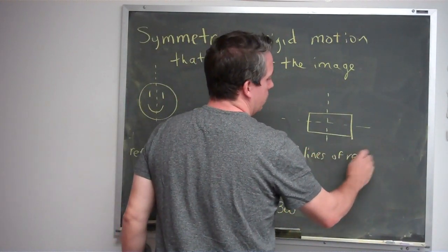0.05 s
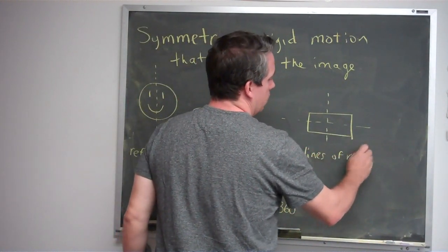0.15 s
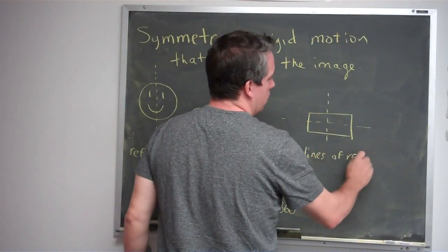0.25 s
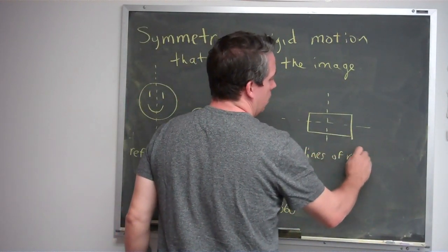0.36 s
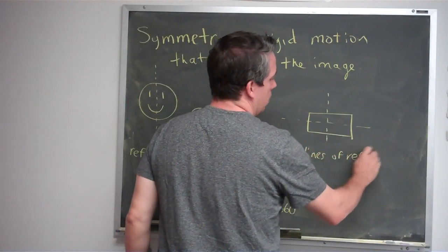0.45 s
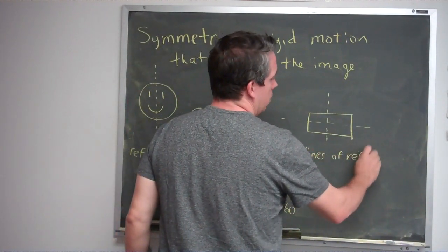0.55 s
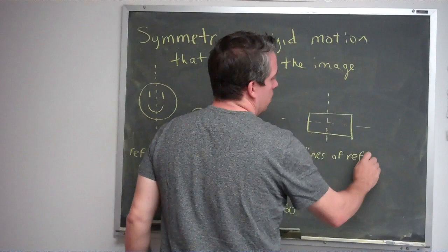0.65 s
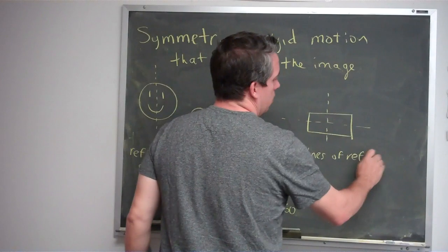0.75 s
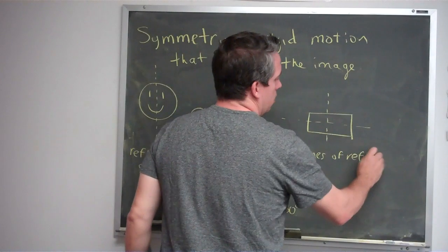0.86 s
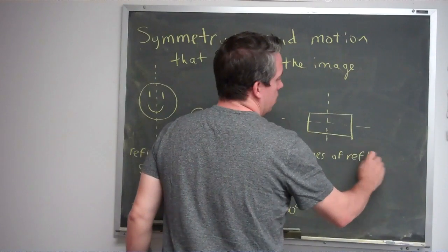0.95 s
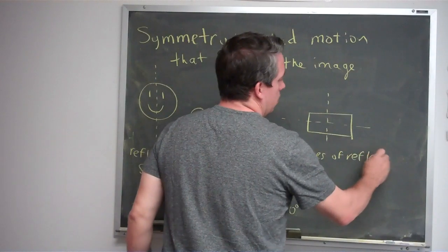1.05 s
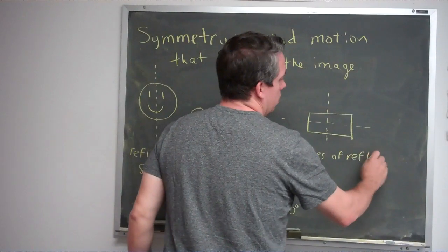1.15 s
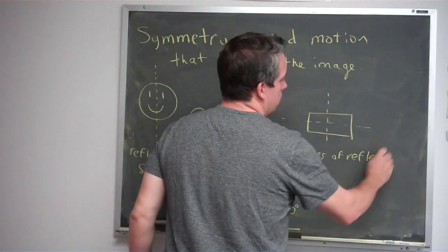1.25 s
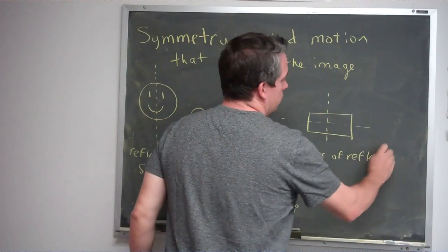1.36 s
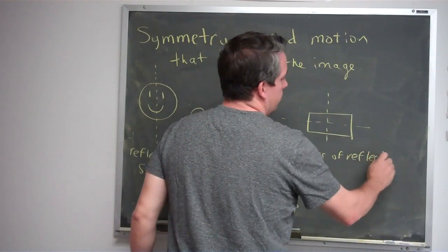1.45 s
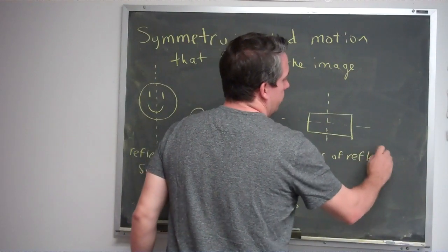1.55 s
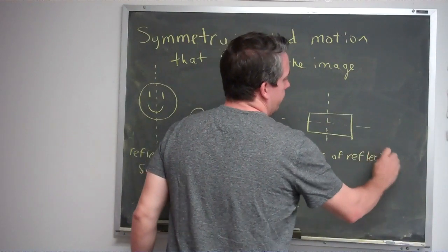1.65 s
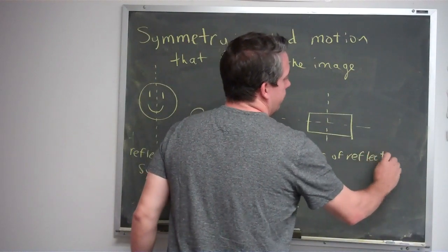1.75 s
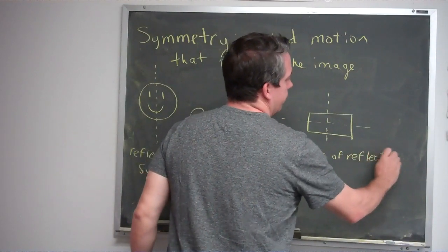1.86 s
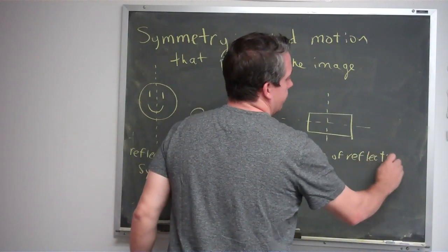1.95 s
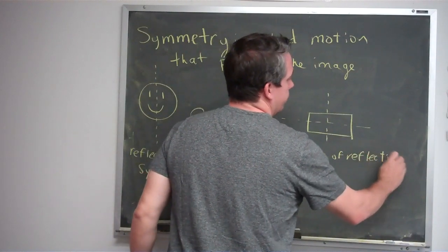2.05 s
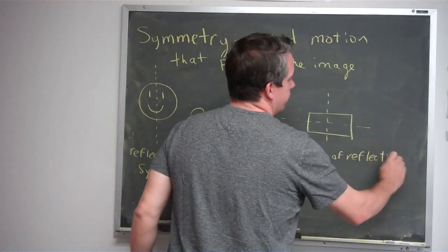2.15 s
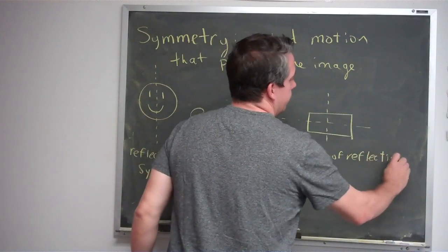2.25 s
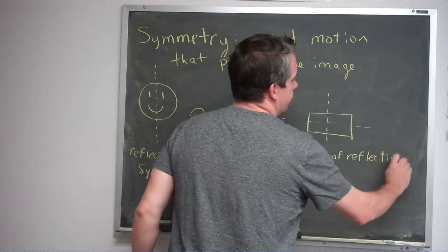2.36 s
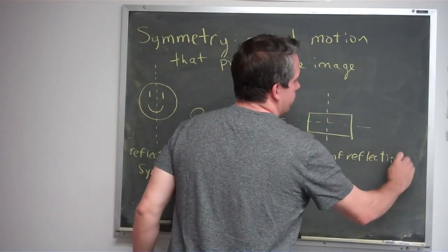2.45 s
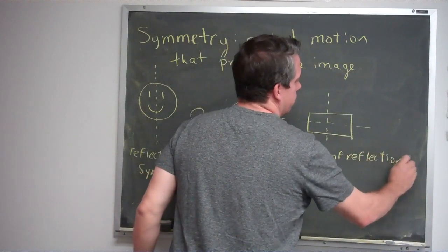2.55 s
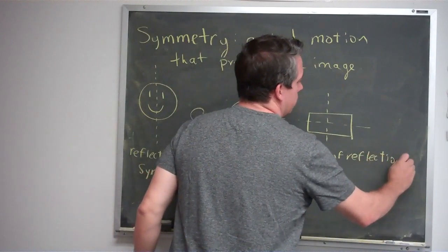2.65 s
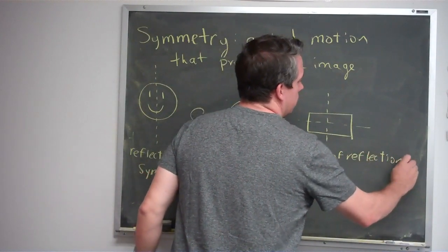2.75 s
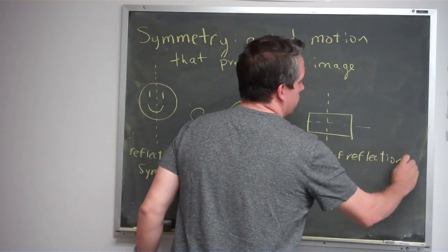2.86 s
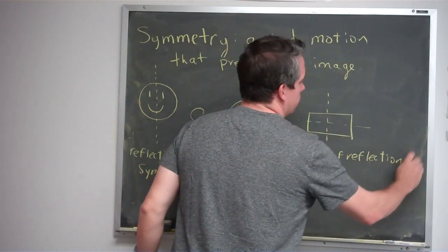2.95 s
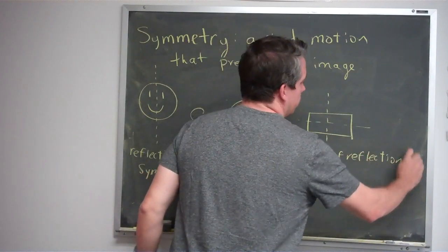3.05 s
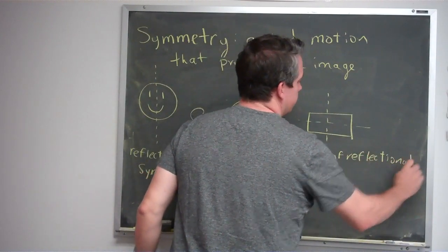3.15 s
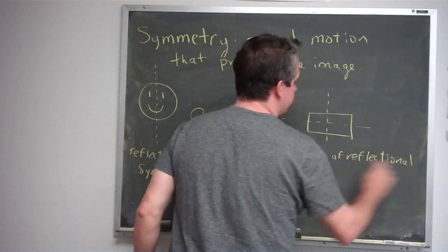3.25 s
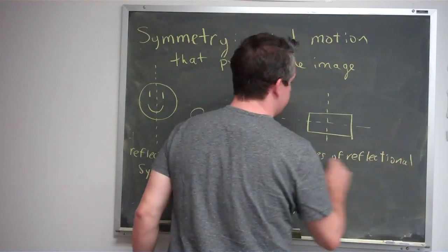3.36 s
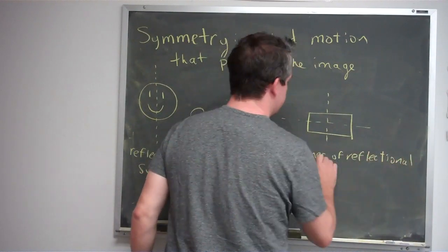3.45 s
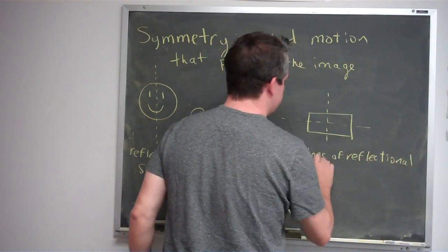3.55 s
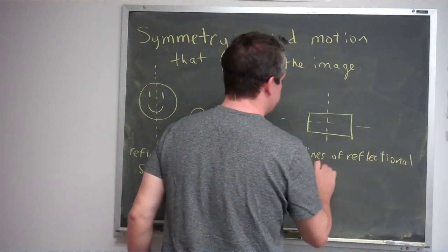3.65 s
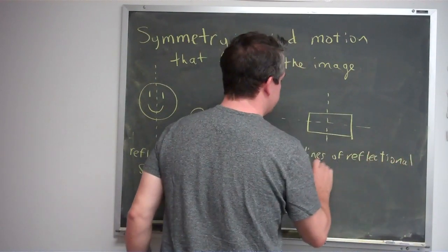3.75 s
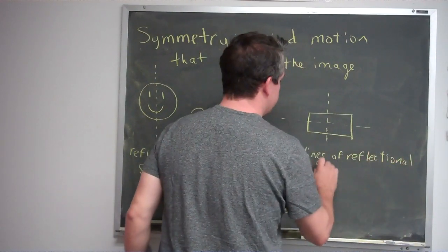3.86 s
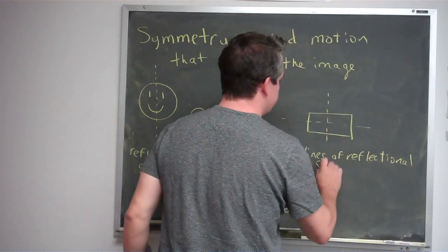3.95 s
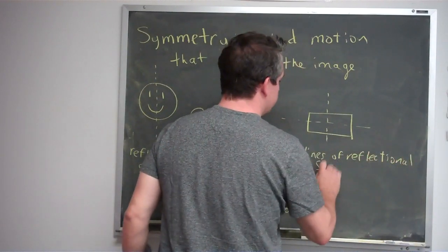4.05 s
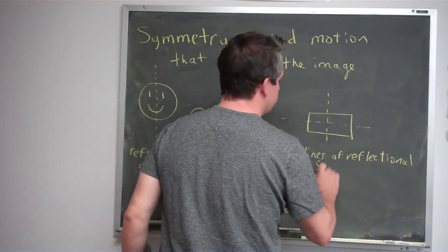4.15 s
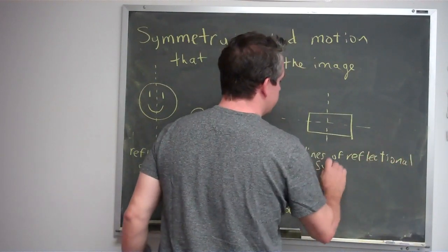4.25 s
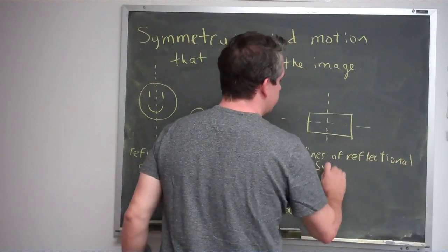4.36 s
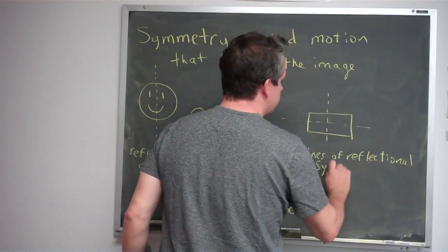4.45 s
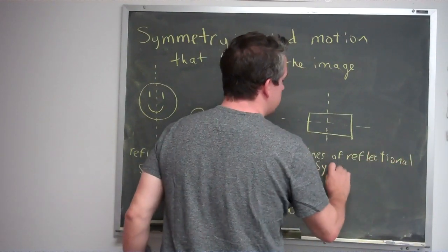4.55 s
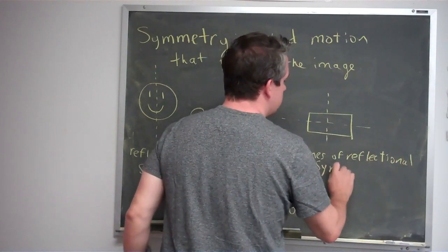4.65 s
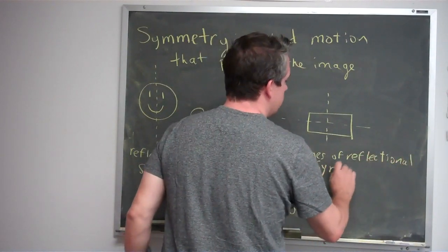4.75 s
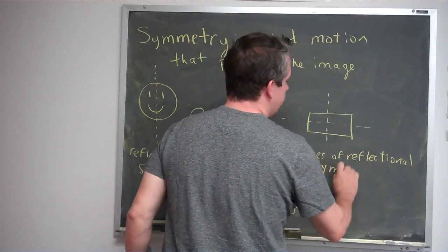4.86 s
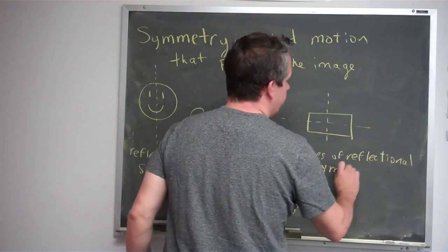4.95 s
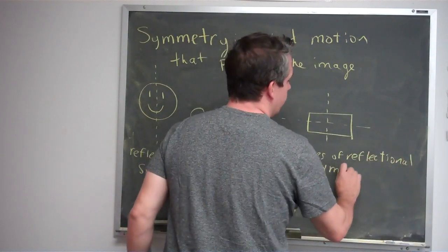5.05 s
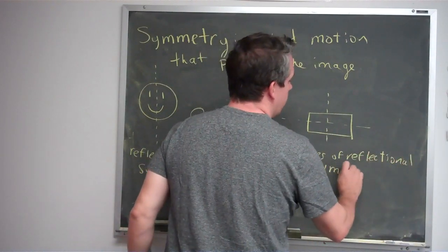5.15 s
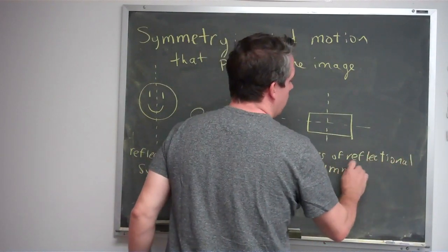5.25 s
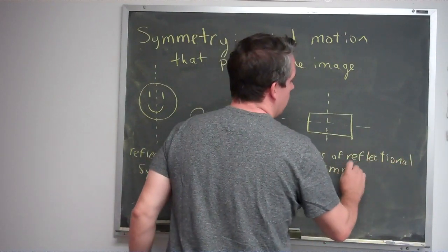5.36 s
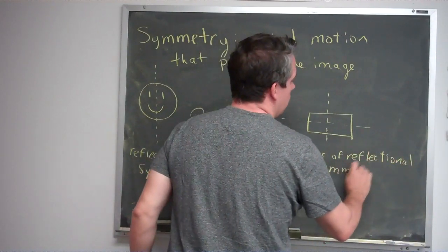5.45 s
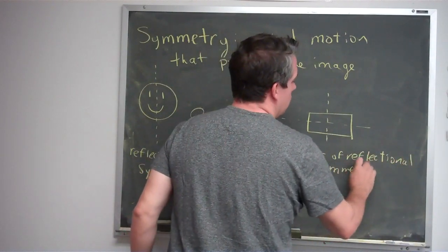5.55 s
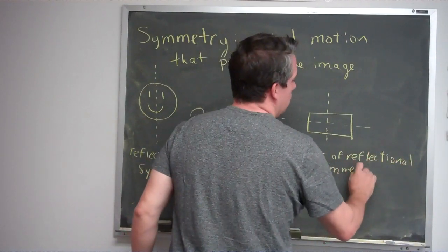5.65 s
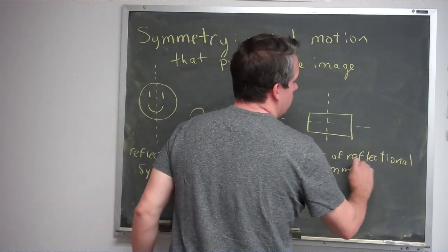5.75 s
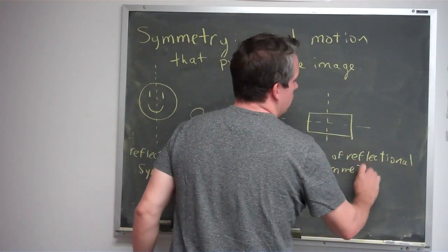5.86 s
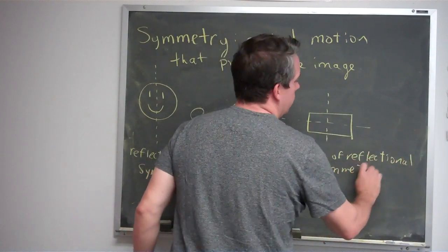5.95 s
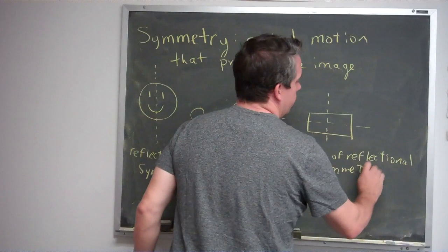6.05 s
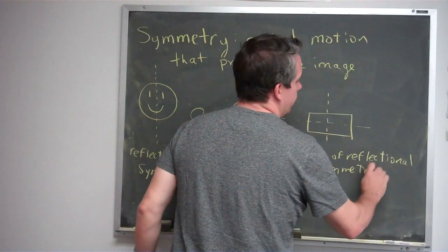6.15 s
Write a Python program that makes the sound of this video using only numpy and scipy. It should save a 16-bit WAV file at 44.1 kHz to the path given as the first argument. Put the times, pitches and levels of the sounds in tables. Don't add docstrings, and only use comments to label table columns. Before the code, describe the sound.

A person writes with chalk on a wall board, heard close in stereo in a small quiet room. A drag is already under way, then sharp hollow taps follow irregularly, each trailed by a short dry scrape. Small stick-slip squeaks appear now and then. Low ventilation hums throughout, and a thin, very high electronic whine wavers after the first second.

```python
import sys
import numpy as np
from scipy import signal
from scipy.fft import rfft, irfft, next_fast_len
from scipy.io import wavfile
from scipy.ndimage import map_coordinates

SR = 44100
rng = np.random.default_rng(int(sys.argv[2]) if len(sys.argv) > 2 else 0)


def put_to_file(sound):
    columns = np.atleast_2d(sound).T
    safe = np.clip(columns, -1, 1)
    whole_steps = np.round(safe * 32767)
    wavfile.write(sys.argv[1], SR, whole_steps.astype(np.int16))


def elevation(decibels):
    levels = np.asarray(decibels, float)
    return 10 ** (levels / 20)


N = 273861
STEP = 32


def unit(x):
    return x / np.sqrt(np.mean(x ** 2) + 1e-20)


def along(points, hz):
    f, v = np.transpose(points)
    return np.interp(np.log(hz + 1), np.log(f + 1), v)


def wobble(rate):
    knots = rng.standard_normal(int(N * rate / SR) + 4)
    return map_coordinates(knots, [np.arange(N) * rate / SR])


def decay(t, t60):
    return elevation(-60 * t / t60)


def build_up(t, seconds):
    return 1 - np.exp(-t / seconds)


def peak(hz, centre_hz, width_hz):
    return 1 / (1 + ((hz - centre_hz) / width_hz) ** 2)


def noise_pair(length=N):
    return rng.standard_normal((2, length))


def filtered(x, response):
    m = next_fast_len(x.shape[-1] + 4096)
    spectrum = rfft(x, m) * response(np.fft.rfftfreq(m, 1 / SR))
    return irfft(spectrum, m)[..., :x.shape[-1]]


def diffuse(pair, gain):
    # hz, likeness (0 to 1)
    likeness = [(40, 0.11), (130, 0.96), (400, 0.93), (800, 0.9), (1400, 0.67), (3000, .35), (6000, 0)]
    turn = lambda hz: np.arccos(np.clip(along(likeness, hz), -1, 1)) / 2
    mid, side = filtered(pair, lambda hz: gain(hz) * np.array([np.cos(turn(hz)), np.sin(turn(hz))]))
    return unit(np.array([mid + side, mid - side]))


def ventilation():
    # hz, level_db
    air_colour = [(15, -40), (25, -26), (65, -13), (106, -12), (200, 0.5), (311, -13), (460, -10),
                  (800, -16.5), (1200, -19.5), (2200, -22.5), (5000, -31.5), (8000, -35.5), (14000, -51)]
    # centre_hz, width_hz, level_db
    duct_modes = [(460, 13, -65.5), (1970, 50, -84), (2178, 16, -70), (4410, 27, -81)]
    # pitch_hz, wander_hz, level_db, flutter_db
    hum_lines = [(120.2, 0.91, -59, 2), (172.7, 8.43, -69.5, 5.5), (206.9, 4.86, -58, 4),
                 (238.8, 3.88, -66, -4.5), (280.7, 5, -75, 15), (358.6, 1.97, -65.5, -3)]
    air = diffuse(noise_pair(), lambda hz: elevation(along(air_colour, hz)))
    air *= elevation(-53.0 + 0.27 * wobble(3.8))
    for centre_hz, width_hz, db in duct_modes:
        air += elevation(db) * diffuse(noise_pair(), lambda hz: peak(hz, centre_hz, width_hz))
    t = np.arange(N) / SR
    for hz, wander_hz, db, flutter_db in hum_lines:
        drift = np.cumsum(wander_hz * wobble(30)) / SR
        level = elevation(db + flutter_db * np.tanh(wobble(9)))
        air += np.sqrt(2) * level * np.sin(2 * np.pi * (hz * t + drift))
    return air


def whine():
    # time_s, level_db
    swells = [(0.0, -90), (1.12, -83), (1.19, -65), (1.44, -42.5), (1.66, -56), (2.7, -53.5), (2.8, -49),
              (3.12, -53.5), (3.25, -72), (3.3, -55), (3.65, -57.5), (4.07, -69), (4.4, -48.5),
              (4.7, -53.5), (4.8, -60), (5.15, -58), (5.25, -64.5), (6.2, -65)]
    # centre_hz, width_hz, level_db
    lines = [(6820, 19.5, 1), (6916, 19, -2)]
    sound = elevation(-8) * diffuse(noise_pair(), lambda hz: 1 / (1 + ((hz - 6880) / 95) ** 8))
    for centre_hz, width_hz, db in lines:
        line = diffuse(noise_pair(), lambda hz: peak(hz, centre_hz, width_hz))
        sound += elevation(db - 4 + 1.8 * wobble(7)) * line
    time_s, level_db = np.transpose(swells)
    swell_db = np.interp(np.arange(N) / SR, time_s, level_db)
    return elevation(swell_db - 9.0 + 2.9 * wobble(11)) * sound


def board(hz, between_db):
    # centre_hz, width_hz, level_db
    upper_modes = [(1350, 14, -0.5), (1400, 40, -3.5), (1380, 24, -12), (1523, 27, -1.5), (1666, 33, 0),
                   (1860, 34, -7), (1860, 10, -3.5), (1991, 63, -2), (2240, 37, -1), (2420, 30, -6.5),
                   (2580, 42, -7.5), (2666, 13, -1.5), (3140, 15, -5.5), (3460, 17, -3.5)]
    power = elevation(2 * between_db)
    for centre_hz, width_hz, db in upper_modes:
        power = power + elevation(2 * db) * peak(hz, centre_hz, width_hz / 2)
    return np.sqrt(power)


def catches():
    # start_s, level_db, centre_hz, t60_s
    grabs = [
        (0.141, -47, 1950, 0.042),
        (1.098, -46, 2000, 0.043),
        (2.52, -52, 2080, .08),
        (2.878, -47.5, 1400, 0.15),
        (4.176, -47.5, 2780, 0.13),
        (4.26, -44, 1000, 0.093),
        (5.411, -47, 1760, 0.32),
        (5.47, -45, 3180, 0.15),
        (5.57, -45, 925, .1),
        (6.089, -51, 1700, 0.16),
    ]
    t = np.arange(int(.2 * SR)) / SR
    out = np.zeros((2, N + len(t)))
    for s, db, centre_hz, t60 in grabs:
        region = diffuse(noise_pair(len(t)), lambda hz: peak(hz, centre_hz, 0.13 * centre_hz))
        begin = round(s * SR)
        out[:, begin:begin + len(t)] += elevation(db) * decay(t, t60) * build_up(t, 0.0054) * region
    return out[:, :N]


def grit(rate, fine):
    breaks = rng.random((2, N)) < rate / SR
    return unit(breaks * noise_pair()) + fine * noise_pair()


def contact_shape(start, length):
    press_s, lift_db_per_s = 0.0054, 324
    since = np.arange(0, N, STEP) / SR - start[:, None]
    lifted = np.clip(since - length[:, None], 0, 1)
    return np.clip(since / press_s, 0, 1) * elevation(-lift_db_per_s * lifted)


def strokes():
    # start_s, length_s, pressure_db, dust_over_pressure_db
    drags = [(0.0, 0.12, -54, -7), (0.236, 0.13, -49.5, -10), (.5, 0.078, -54.5, -16),
             (0.629, 0.098, -49.5, -7), (.845, 0.26, -55.5, -5), (1.183, 0.15, -56.5, -3.5),
             (1.46, 0.12, -50.5, -9.5), (1.685, 0.079, -52, -8.5), (1.783, 0.091, -54, -12),
             (1.947, 0.055, -57, -6), (2.05, 0.205, -55.5, -3), (2.365, 0.074, -63.5, -8.5),
             (2.467, 0.16, -56, -3.5), (2.715, 0.21, -56, -5.5), (2.972, 0.061, -57.5, -9),
             (3.128, 0.11, -50, -3.5), (3.403, 0.16, -65, 6.5), (3.615, 0.19, -52, -5),
             (3.95, 0.17, -53.5, -7), (4.161, 0.064, -48, -9.5), (4.371, 0.24, -53.5, -4.5),
             (4.666, .15, -55.5, -9), (4.94, 0.22, -53.5, -10), (5.225, .18, -55.5, -7),
             (5.414, 0.13, -54.5, -4.5), (5.656, 0.11, -55.5, -9), (5.852, 0.12, -49.5, -6),
             (6.059, 0.043, -54.5, -9.5)]
    # hz, level_db
    scrape_colour = [(700, -18), (1300, -8.5), (1800, -1.5), (3000, 2.5), (4500, -4.5), (6000, -20.5),
                     (9000, -17.5)]
    # hz, level_db
    dust_colour = [(3500, -14), (5500, -7), (7000, -3.5), (9000, -13.5), (11000, -10), (14000, -23)]
    # hz, level_db
    rub_colour = [(300, 3), (450, -12), (700, 3.5), (1100, -10), (1700, -16.5)]
    start, length, pressure_db, dusty_db = np.transpose(drags)
    forces = elevation([pressure_db, pressure_db + dusty_db]) @ contact_shape(start, length)
    pressure, dusty = np.repeat(forces, STEP, axis=1)[:, :N]
    judder = np.tanh(wobble(35))
    scrape = diffuse(grit(rate=2500, fine=1.0),
                     lambda hz: elevation(along(scrape_colour, hz)) * board(hz, between_db=-11))
    dust = diffuse(grit(rate=4000, fine=0.48), lambda hz: elevation(along(dust_colour, hz)))
    rub = diffuse(noise_pair(), lambda hz: elevation(along(rub_colour, hz)))
    sound = pressure * elevation(-3.0 + 2 * judder) * scrape
    sound += dusty * elevation(-5.5 + 1.17 * judder) * dust
    sound += elevation(-61) * unit(pressure) ** 0.55 * rub
    return sound


def wall_thump(t):
    # pitch_hz, t60_s, level_under_blow_db
    fixings = [(62.3, .2, -44), (175, 0.13, -33.5), (271, 0.3, -40.5)]
    sway = sum(elevation(db) * decay(t, t60) * np.sin(2 * np.pi * hz * t) for hz, t60, db in fixings)
    return build_up(t, 0.0055) * sway


def dense_modes(t, hard_db, crisp_db, lift_db):
    # hz, level_db
    blow_colour = [(330, -47.5), (420, -10.5), (700, -9), (1050, -3.5), (1300, -2), (1700, -0.5),
                   (2700, 4.5), (3600, -0.5), (5000, -19), (7000, -26.5), (9500, -35.5), (14000, -39.5)]
    favoured_hz = 1950 + 18 * hard_db
    contact = [(1800, 0.019), (3400, hard_db + 5.5), (7500, crisp_db + 18.5)]

    def colour(hz):
        favour = elevation(lift_db * peak(hz, favoured_hz, 250))
        return elevation(along(blow_colour, hz) + along(contact, hz)) * favour * board(hz, between_db=-3.5)

    return diffuse(noise_pair(len(t)), colour)


def dying_bands(t, dense):
    # centre_hz, first_crack_db, board_t60_s, room_t60_s
    fading_bands = [(454, 4.5, 0.26, 0.25), (1000, -25, 0.17, 0.24), (2000, -19, 0.022, 0.19),
                    (3720, 2, 0.04, .2), (8000, 9, 0.015, 0.25), (13000, 8, 0.017, 0.19)]
    centres = [row[0] for row in fading_bands]
    ring = np.zeros_like(dense)
    for share, (_, crack_db, board_t60, room_t60) in zip(np.eye(len(centres)), fading_bands):
        band = filtered(dense, lambda hz: along(list(zip(centres, share)), hz))
        ring += band * (elevation(crack_db) * decay(t, 0.023) + decay(t, board_t60) + decay(t, room_t60))
    return ring


def separate_modes(t, low_db, knock_db, middle_db):
    # pitch_hz, t60_s
    lowest = [(433, 0.16), (514, 0.24), (594, 0.17)]
    # pitch_hz, level_db, t60_s
    middle = [(650, -16, 0.16), (741, -24.5, 0.084), (796, -8, 0.063), (874, -19, 0.2), (917, -14, 0.098),
              (1007, -24, 0.1), (1057, -14.5, 0.21), (1116, -14, 0.2), (1171, -9.5, 0.18)]
    levels_db = [low_db + 6.5, (low_db + knock_db) / 2 + 4.5, knock_db + 6.0]
    modes = np.zeros(len(t))
    for db, (hz, t60) in zip(levels_db, lowest):
        modes += elevation(db) * decay(t, t60) * np.sin(2 * np.pi * hz * t)
    for hz, db, t60 in middle:
        level = elevation(middle_db + db + rng.normal(0, 0.78))
        modes += level * decay(t, t60) * np.sin(2 * np.pi * hz * t + rng.uniform(0, 2 * np.pi))
    return build_up(t, 0.0015) * modes


def contact_click(t, hard_db):
    click_hz = 1500 * elevation(0.21 * (hard_db + 21.0))
    return -elevation(-2) * decay(t, .01) * np.sin(2 * np.pi * click_hz * t)


def taps():
    # start_s, peak_db, hardness_db, crispness_db
    landings = [(0.2376, -11, -19.5, -19), (0.501, -10, -3.5, -13), (0.6396, -12.5, -17, -26.5),
                (0.8422, -22.5, -27.5, -31), (1.192, -10, -11, -17.5), (1.4493, -5, -5.5, -10.5),
                (1.6872, -8, -11, -18.5), (1.7866, -19, -9, -16), (1.947, -15.5, -24.5, -14.5),
                (2.0518, -9, -7, -16), (2.364, -16.5, -20.5, -28), (2.7202, -11, -17, -26),
                (3.1411, -7.5, -15.5, -24), (3.6075, -13.5, -19, -28), (3.9647, -7.5, -5.5, -20.5),
                (4.3659, -12, -7.5, -10.5), (4.9361, -9.5, -3.5, -13.5), (5.6619, -10, -9, -18),
                (5.8601, -12, -11, -31.5), (6.1685, -15.5, -14.5, -16.5)]
    # lowest_mode_db, knock_mode_db, middle_modes_db, favoured_region_db
    places = [(-27.5, -21.5, -7.5, 3), (-29.5, -28, -16.5, 7), (-25, -21, -6, 1), (-21, -16, -4, -2),
              (-32.5, -23, -10.5, 3), (-35.5, -25, -9, 3), (-32.5, -22, -9.5, 3), (-46, -24, -10, 6),
              (-25, -15.5, -3, 5.5), (-40, -21.5, -16, 5.5), (-36, -15, -7.5, -1.5), (-46.5, -19, -7, 1),
              (-38, -19.5, -8.5, 2), (-22.5, -39, -4.5, -3.5), (-27.5, -44, -7.5, 3.5),
              (-25, -43, -10, 4.5), (-31, -28, -22, 3.5), (-29, -24.5, -11, 4.5), (-31, -23, -8.5, 2),
              (-24, -20.5, -12, 5)]
    t = np.arange(int(.35 * SR)) / SR
    sound, push = np.zeros((2, N + len(t))), np.zeros(N + len(t))
    lead_in = np.linspace(0, 1, num=round(.005 * SR))
    thump = wall_thump(t)
    for (s, db, hard_db, crisp_db), (low_db, knock_db, middle_db, lift_db) in zip(landings, places):
        dense = dense_modes(t, hard_db, crisp_db, lift_db)
        blow = contact_click(t, hard_db)
        blow = blow + elevation(-9) * build_up(t, .0012) * dying_bands(t, dense)
        blow += separate_modes(t, low_db, knock_db, middle_db)
        begin = round(s * SR)
        now = slice(begin, begin + len(t))
        sound[:, now] += elevation(db) * blow
        sound[:, begin - len(lead_in):begin] += elevation(db - 57) * lead_in * dense[:, -len(lead_in):]
        push[now] += elevation(db) * thump
    above_thump = signal.butter(6, 390, "high", fs=SR, output="sos")
    return (signal.sosfilt(above_thump, sound) + push)[:, :N]


def scene():
    return ventilation() + whine() + catches() + strokes() + taps()


def gain_control(x, knee_db, slope, release):
    keep = np.exp(-1 / (release * SR))
    recent = signal.lfilter([1 - keep], [1, -keep], np.mean(x ** 2, axis=0))
    level_db = 10 * np.log10(recent + 1e-12)
    return x * elevation(-slope * np.maximum(level_db - knee_db, 0))


def roll_off(x):
    return signal.sosfilt(signal.butter(12, 15520, fs=SR, output="sos"), x)


def record(dry):
    # cavity_hz, width_hz, mesh_rolloff_hz, preamplifier_hiss_db
    ports = [(7850, 995, 19500, -65), (6400, 1030, 9300, -68.5)]
    # centre_hz, width_hz, level_db
    circuit_tones = [(7900, 25, -74), (11830, 22, -80.5)]

    def cavities(f):
        return np.array([c * c / (c * c - f * f + 1j * f * w) / (1 + 1j * f / mesh) ** 2
                         for c, w, mesh, _ in ports])

    hiss = elevation([[port[3]] for port in ports]) * noise_pair()
    for centre_hz, width_hz, db in circuit_tones:
        tone = filtered(rng.standard_normal(N), lambda hz: peak(hz, centre_hz, width_hz))
        hiss += elevation(db) * unit(tone)
    picked = filtered(dry, cavities) + hiss
    picked = elevation(1) * gain_control(picked, knee_db=-23, slope=0.089, release=0.011)
    rounded = picked / (1 + picked ** 6) ** (1 / 6)
    mix = filtered(rounded, lambda hz: hz < 14250)
    return roll_off(mix)


dry = scene()
out = record(dry)
put_to_file(out)
```